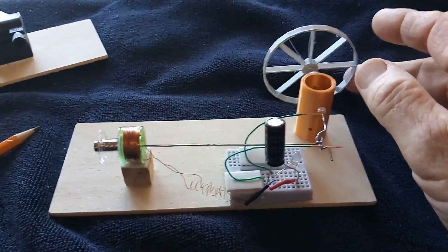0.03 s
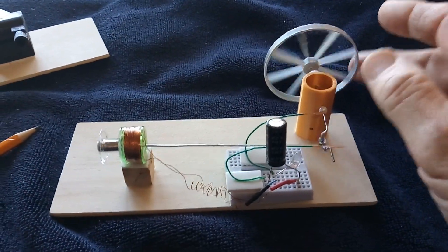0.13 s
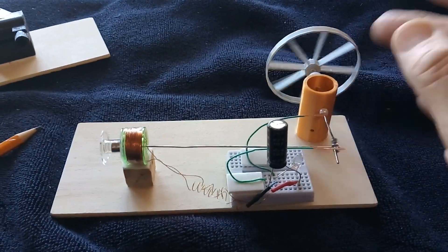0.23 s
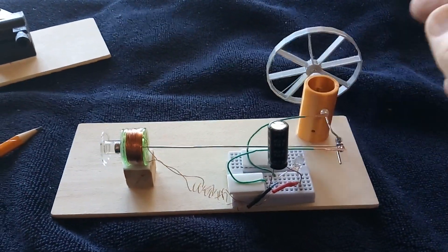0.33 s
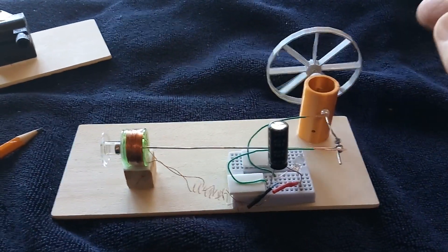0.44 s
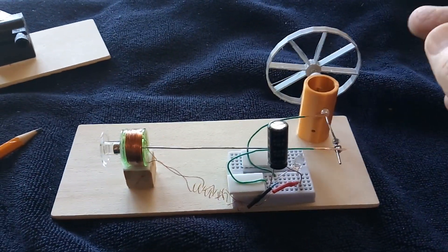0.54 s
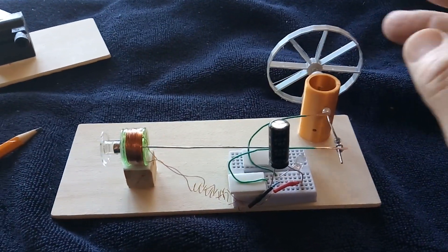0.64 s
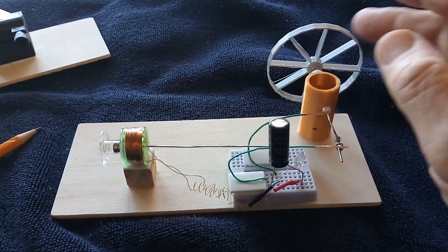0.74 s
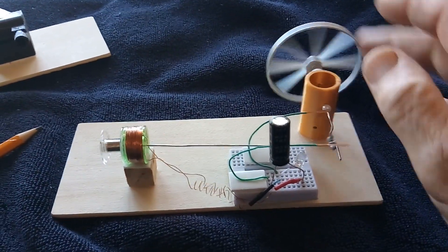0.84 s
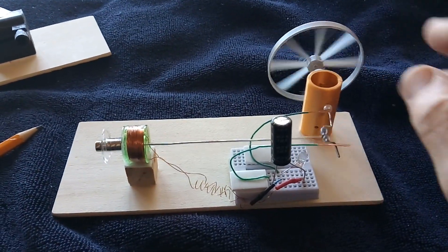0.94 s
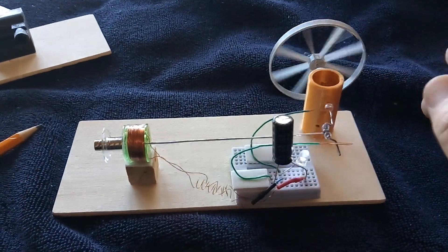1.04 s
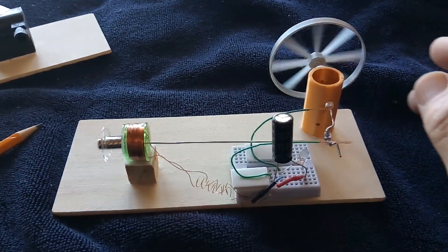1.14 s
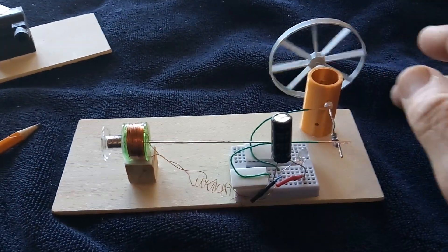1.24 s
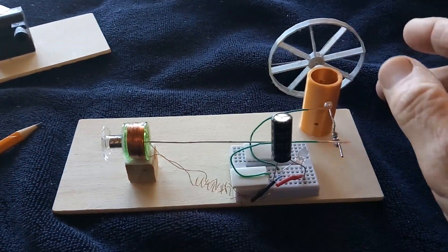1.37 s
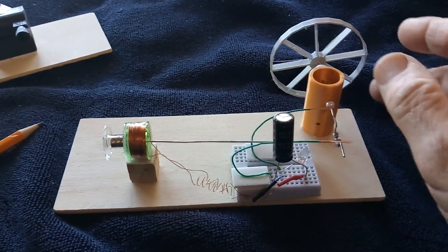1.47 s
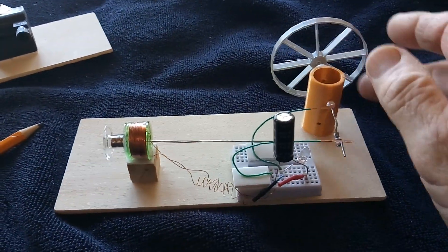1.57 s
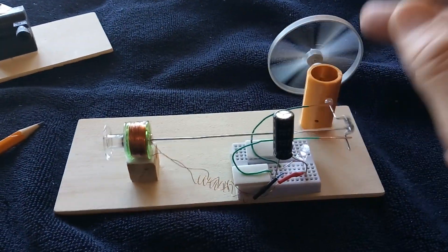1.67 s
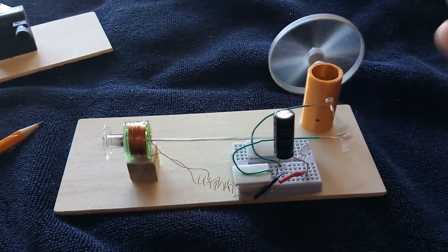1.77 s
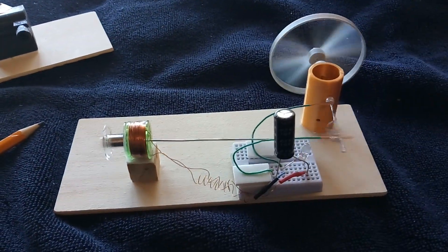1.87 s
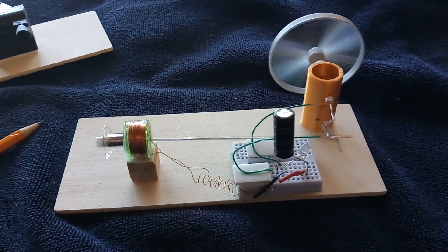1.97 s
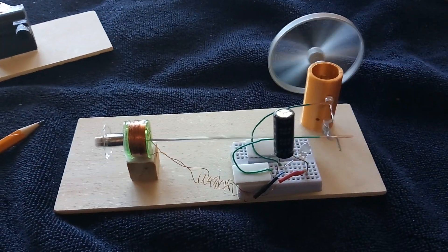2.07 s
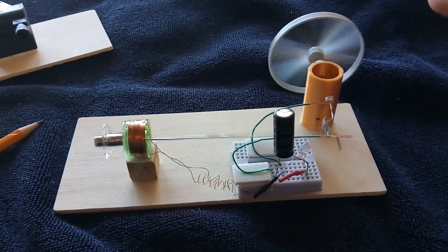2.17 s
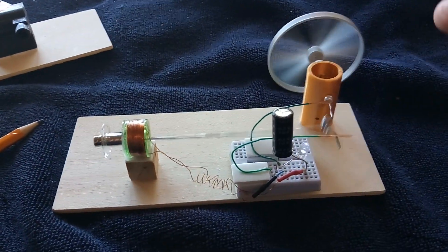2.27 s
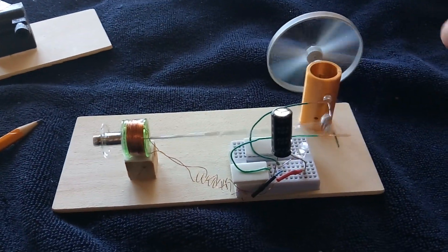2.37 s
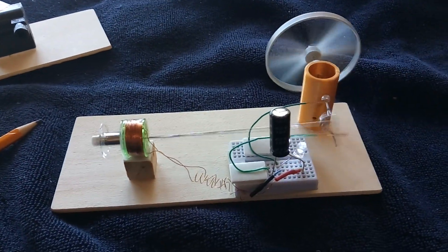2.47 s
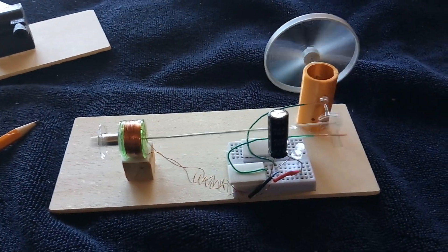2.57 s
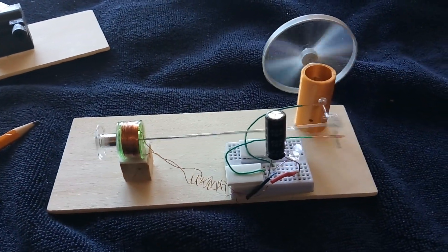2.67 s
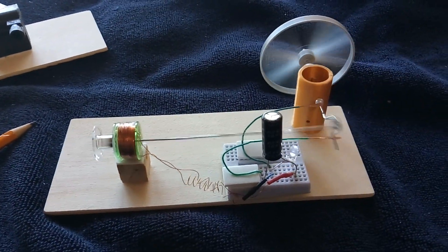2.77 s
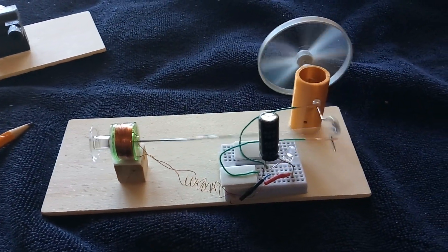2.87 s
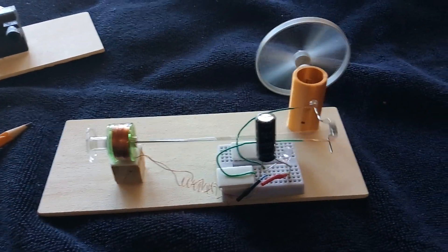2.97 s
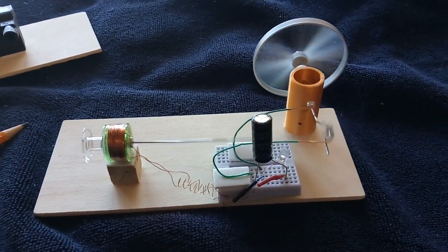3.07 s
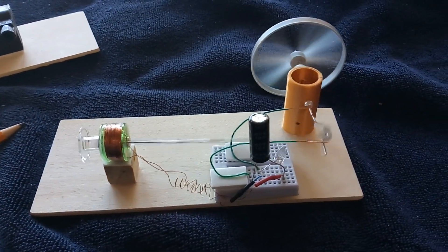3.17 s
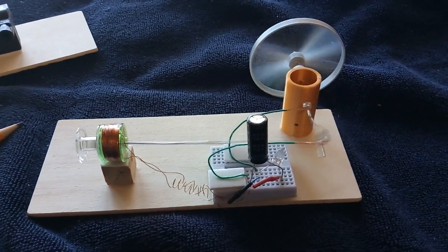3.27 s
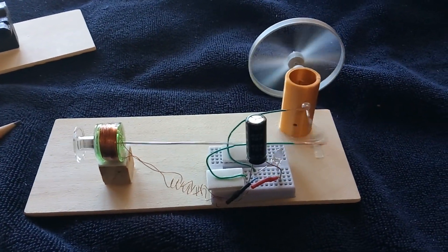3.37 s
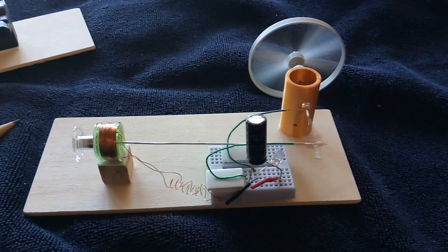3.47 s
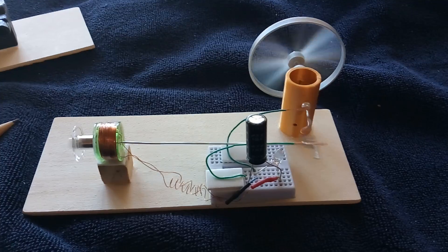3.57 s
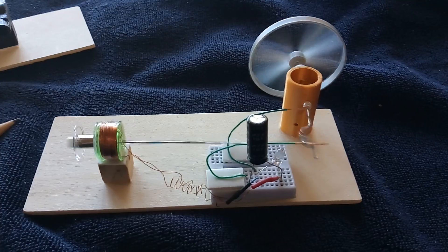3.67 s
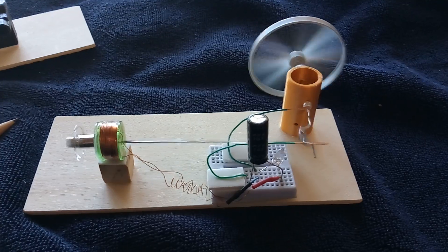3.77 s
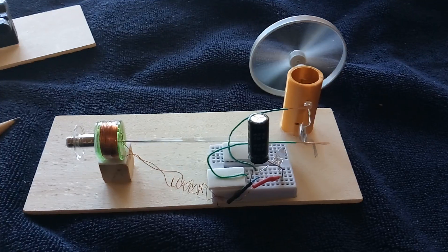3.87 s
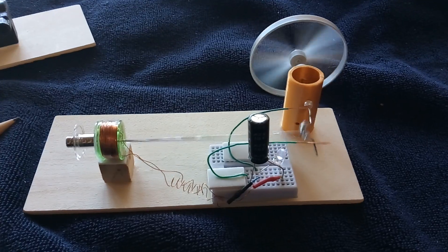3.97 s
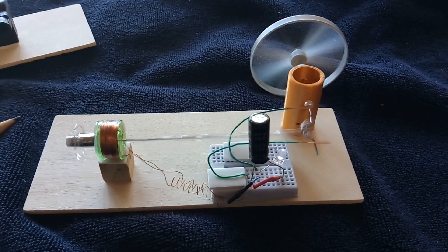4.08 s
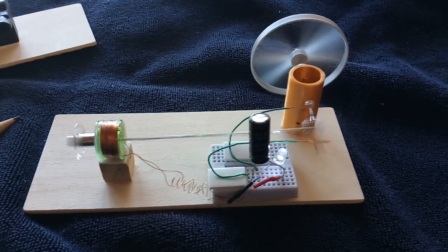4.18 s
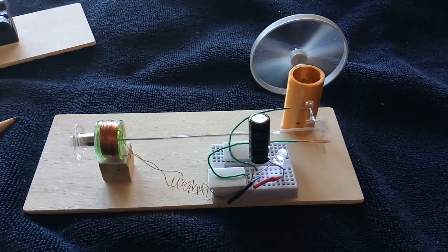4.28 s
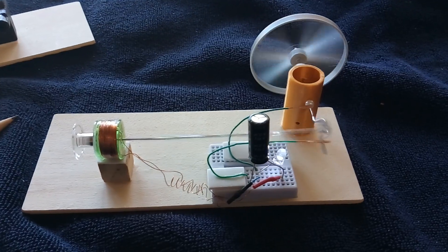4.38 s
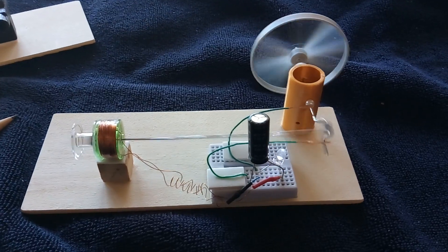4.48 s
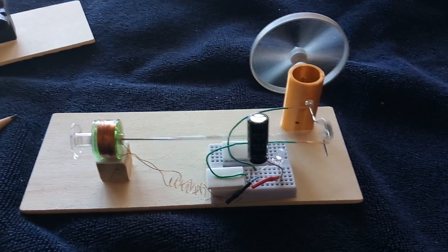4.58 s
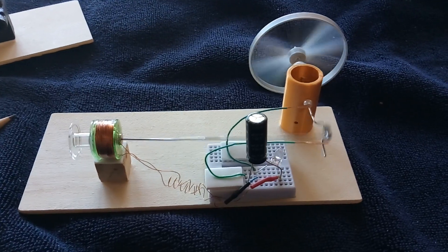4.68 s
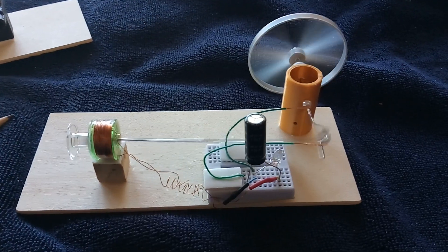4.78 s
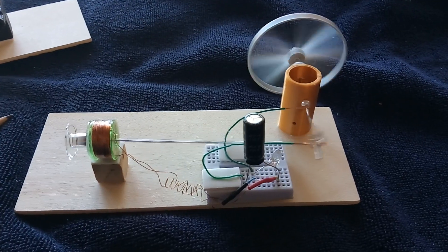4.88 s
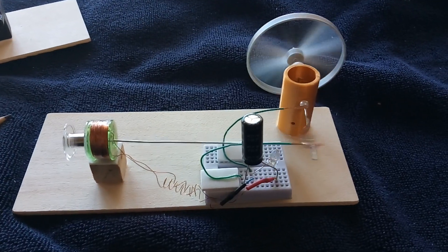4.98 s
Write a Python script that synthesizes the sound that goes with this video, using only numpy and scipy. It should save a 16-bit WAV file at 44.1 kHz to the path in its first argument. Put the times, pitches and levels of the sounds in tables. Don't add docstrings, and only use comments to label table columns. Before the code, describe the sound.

A few faint clicks and scrapes, then a small wooden-board engine catches and clatters rapidly, about nine hard knocks a second, sharper near the end.

```python
import sys
import numpy as np
from scipy import signal
from scipy.fft import rfft, irfft
from scipy.io import wavfile

SR = 44100
rng = np.random.default_rng(int(sys.argv[2]) if len(sys.argv) > 2 else 0)


def log_audio(samples):
    frames = np.atleast_2d(samples).T
    limited = np.clip(frames, -1, 1)
    pcm = np.round(limited * 32767).astype(np.int16)
    wavfile.write(sys.argv[1], SR, pcm)


def ratio(d):
    e = np.asarray(d, float) / 20
    return 10 ** e


N = 221081

# (time [s], board level [dB], steel level [dB])
RETURNS = [(2.24, -34, -32), (2.453, -34, -35), (3.0908, -28, -29), (3.1977, -38, -38), (3.3017, -31, -34),
           (3.726, -34, -30.5), (3.831, -20.5, -21.5), (3.939, -22, -22.5), (4.0463, -25.5, -24),
           (4.1525, -18, -17.5), (4.261, -17.5, -13), (4.3686, -18.5, -13.5), (4.476, -19.5, -13.5),
           (4.583, -21.5, -12.5), (4.6895, -20.5, -16.5), (4.798, -20.5, -14.5), (4.907, -23.5, -14.5)]


def band(x, lo_hz, hi_hz, order):
    return signal.sosfilt(signal.butter(order, [lo_hz, hi_hz], "bandpass", fs=SR, output="sos"), x)


def decay(t60_s):
    return np.exp(-np.log(1000) / (t60_s * SR))


def struck(force, modes, spot_db, rate_hz, slip_rad=0.98):
    out, power, hold = 0, 0, int(SR / rate_hz)
    for k, (hz, db, t60_s) in enumerate(modes):
        pole = decay(t60_s) * np.exp(2j * np.pi * hz / SR)
        share = ratio(db + spot_db * rng.standard_normal(N // 100))
        phase = np.pi * k + slip_rad * rng.standard_normal(N // 100)
        spot = np.repeat(share * np.exp(1j * phase), hold)[:N]
        out = out + signal.lfilter([1], [1, -pole], force * spot).imag
        power = power + ratio(db) ** 2
    return out / np.sqrt(power)


def ticks(rate_hz, spread_db):
    hit = rng.random(N) < rate_hz / SR
    x = hit * rng.choice([-1, 1], N) * ratio(spread_db * rng.exponential(size=N))
    return x / np.sqrt(np.mean(x ** 2))


def air():
    # (frequency [Hz], density [dB per Hz])
    noise_shape = [(15, -38), (30, -3), (60, 10.5), (118, 12.5), (220, 10.5), (400, 5.5), (460, 2.5),
                   (1220, -5), (3500, -8), (6500, -9.5), (8000, -21.5), (13500, -24.5), (15000, -10.5),
                   (16500, -58)]
    # (frequency [Hz], level [dB rms])
    hum_lines = [(118.4, -78), (296.1, -78.5), (355.3, -76), (414.5, -81.5), (925.9, -93), (2040, -98),
                 (8226, -93.5), (15418, -103)]
    level_db = -66.5
    hz, db = np.transpose(noise_shape)
    shape = ratio(np.interp(np.log(np.fft.rfftfreq(N, 1 / SR) + 1), np.log(hz), db))
    out = irfft(rfft(rng.standard_normal(N)) * shape, N)
    out *= ratio(level_db) / np.sqrt(np.mean(out ** 2))
    t = np.arange(N) / SR
    for f, line_db in hum_lines:
        drift_rad = np.cumsum(rng.standard_normal(N)) * 0.0018
        out += np.sqrt(2) * ratio(line_db) * np.sin(2 * np.pi * f * t + drift_rad)
    return out


def hits():
    # (time [s], board level [dB], steel level [dB])
    nudges = [(0.2341, -48, -55.5), (0.2458, -42, -64), (0.8057, -63, -55), (0.8582, -58, -71),
              (0.8838, -37, -40), (0.8915, -26.5, -52), (0.9405, -42, -60), (1.3749, -69, -58),
              (1.6812, -46, -53), (1.703, -52, -27), (1.709, -31, -35), (1.7407, -15.5, -18.5),
              (1.7994, -20.5, -24.5), (1.802, -57, -28), (1.8284, -25, -34)]
    # (time [s], board level [dB], steel level [dB])
    strays = [(1.9424, -23.5, -35), (1.9923, -22, -17), (1.9969, -27, -44), (2.3133, -36, -26),
              (2.6258, -32, -28), (2.6398, -27, -23.5), (3.0625, -31, -27.5), (3.1746, -27.5, -29),
              (3.5986, -29, -26), (3.9175, -33, -40), (4.0049, -17.5, -35), (4.025, -30, -38),
              (4.112, -19.5, -23), (4.1312, -38, -51), (4.2205, -19, -31.5), (4.2311, -17.5, -20),
              (4.2716, -25.5, -38), (4.3277, -12, -19), (4.3307, -42, -25), (4.4496, -20, -29),
              (4.761, -38, -27), (4.9794, -17, -23)]
    # (time [s], board peak [dB], steel peak [dB], rebound delay [ms])
    strokes = [(1.8657, -13.5, -15.5, 3.1), (1.9764, -11.5, -15.5, 3), (2.0842, -11.5, -14.5, 2.12),
               (2.1901, -12, -13, 3.1), (2.2955, -13.5, -15.5, 4.4), (2.4012, -12, -14.5, 4.4),
               (2.508, -12.5, -14.5, 4.8), (2.6144, -13.5, -15.5, 2.93), (2.7213, -12.5, -17, 3.15),
               (2.8297, -13.5, -16, 2.9), (2.9375, -13, -16.5, 3.26), (3.0452, -13, -14, 4.1),
               (3.1492, -13.5, -18, 3.1), (3.2542, -13.5, -15, 3.34), (3.3606, -13.5, -16.5, 4.9),
               (3.4673, -14, -18, 5.3), (3.5721, -14, -15.5, 3), (3.6788, -14.5, -16.5, 4.9),
               (3.785, -16, -17, 2.2), (3.892, -15, -18, 3.6), (3.999, -23.5, -20.5, 1.3),
               (4.106, -17.5, -22, 1.8), (4.2137, -20, -22.5, 3.2), (4.3222, -19, -25, 2.8),
               (4.4352, -9.5, -11, 5.7), (4.5422, -8, -10, 2.95), (4.6481, -8, -10, 4.5),
               (4.7564, -8, -9.5, 2.94), (4.868, -8, -11.5, 2.8), (4.9751, -8, -8.5, 1.94)]
    # (time from stroke [ms], board [dB], steel [dB], wander [ms])
    snug_turn = [(-15.5, -48, -33, 0.45), (-8, -40.5, -35, 0.26), (9.5, -28, -35, 1.2),
                 (14, -31.5, -37, 1.5), (19, -32, -33.5, 1.2), (26, -30, -36.5, 0.87), (32, -37, -39, 2.5),
                 (38, -49, -37.5, 2.5), (52, -32, -34.5, 2.7), (57.5, -33.5, -40, 2.5),
                 (71, -29, -39.5, .8), (74, -39.5, -44, 1.2), (79.5, -32.5, -61, 1.16)]
    # (time from stroke [ms], board [dB], steel [dB], wander [ms])
    loose_turn = [(-21, -53, -30, .8), (-14.5, -34, -29, .6), (-11.5, -25.5, -19.5, .6), (-4, -24, -46, .8),
                  (11, -33, -38, 1.9), (29.5, -52, -35, 4.1), (54, -30, -45, 1.8), (66, -26.5, -40, 1.5)]
    loose_from_s, scatter_db = 4.4, 2.5

    rows = nudges + strays + RETURNS
    rows += [(s + 0.0033, board_db - 3.1, steel_db - 9.5) for s, board_db, steel_db in RETURNS]
    for s, board_db, steel_db, rebound_ms in strokes:
        rows.append((s, board_db, steel_db))
        rows.append((s + rebound_ms / 1000, board_db - 12, steel_db - 5.5))
        turn = np.array(loose_turn if s > loose_from_s else snug_turn)
        chance = rng.standard_normal((len(turn), 3))
        at_s = s + (turn[:, 0] + turn[:, 3] * chance[:, 0]) / 1000
        levels_db = turn[:, 1:3] + scatter_db * chance[:, 1:]
        rows += [row for row in np.column_stack([at_s, levels_db]) if row[0] < N / SR]
    return np.transpose(rows)


def contact(s, db, bounce_s, bounce_db, chatter_t60_s, chatter_db, rate_hz):
    at = np.minimum((s - 0.0004) * SR, N - 1).astype(int)
    blows, rebounds = np.zeros(N), np.zeros(N)
    np.add.at(blows, at, ratio(db))
    gaps = 0.8 + 0.4 * rng.random((len(at), 2))
    late = at[:, None] + (np.cumsum(gaps, axis=1) * bounce_s * SR).astype(int)
    sizes = ratio(db)[:, None] * ratio(bounce_db * np.array([1, 2])) * [-1, 1]
    np.add.at(rebounds, np.minimum(late, N - 1), sizes)
    shake = signal.lfilter([1], [1, -decay(chatter_t60_s)], blows)
    return blows + rebounds + ratio(chatter_db) * shake * ticks(rate_hz, 3.0)


def rubbing():
    # (middle [s], half length [s], board level [dB], steel level [dB])
    slides = [(.25, 0.022, -66, -72), (0.824, 0.026, -79, -68), (.92, 0.042, -62, -62),
              (1.028, 0.019, -63.5, -51), (1.082, 0.034, -72.5, -59.5), (1.203, 0.035, -69, -70),
              (1.37, .05, -78, -67)]
    # (time [s], board level [dB], steel level [dB])
    running = [
        (0, -78.5, -80),
        (1.6, -87, -80.5),
        (1.67, -61.5, -50.5),
        (1.75, -52, -45.5),
        (1.91, -59, -55),
        (3.89, -60.5, -53),
        (5.01, -55, -68),
    ]
    t = np.arange(N) / SR
    s, *levels_db = np.transpose(running)
    rub = ratio(np.array([np.interp(t, s, db) for db in levels_db]))
    for mid_s, half_s, *db in slides:
        rub = rub + ratio(np.array(db))[:, None] * np.exp(-((t - mid_s) / half_s) ** 2)
    return rub


def engine():
    # (frequency [Hz], level [dB], T60 [s])
    board_modes = [(456, -20, 0.038), (575, -21.5, 0.011), (691, -4.5, 0.023), (980, -41, 0.0073),
                   (1007, 15, 0.0094), (1281, 13, 0.0053), (1520, -36, 0.005), (1588, 12, 0.0048),
                   (2090, 8, 0.0097), (2330, -1.5, 0.02), (2607, 1, .018), (3140, 2, 0.0086),
                   (3787, 0, 0.012)]
    # (frequency [Hz], level [dB], T60 [s])
    steel_modes = [(4473, 4, 0.0072), (5410, -0.5, 0.0081), (5150, -10, 0.0049), (5882, 8.5, 0.01),
                   (6243, 9.5, 0.0096), (6698, 13, 0.0082), (6500, -43, 0.01), (7240, -8, .008)]
    # (frequency [Hz], level [dB], T60 [s])
    wire_modes = [(8440, 3, 0.034), (8940, 4, 0.002), (10500, -10.5, 0.021), (11050, -5, 0.0049),
                  (12400, -14, 0.0054), (15600, -12, .006)]
    s, board_db, steel_db = hits()
    dull, bright = rubbing()
    thud = contact(s, board_db - 0.5, bounce_s=0.0006774, bounce_db=-3.0,
                   chatter_t60_s=0.031, chatter_db=-26.0, rate_hz=1500)
    thud += ratio(-9.5) * dull * ticks(1200, 1.66)
    ping = contact(s, steel_db - 6, bounce_s=0.0005, bounce_db=1.61,
                   chatter_t60_s=0.034, chatter_db=-23.5, rate_hz=2500)
    ping += ratio(-19.5) * bright * ticks(2500, 1.1)
    board = band(struck(thud, board_modes, spot_db=1.26, rate_hz=150, slip_rad=0.3), 520, 3800, order=3)
    steel = band(struck(ping, steel_modes, spot_db=1.5, rate_hz=140), 2520, 8350, order=3)
    wire = band(struck(ping, wire_modes, spot_db=7.0, rate_hz=140), 9800, 15500, order=2)
    return board + steel + ratio(-26) * wire


def tap(s, db, modes):
    force, n = np.zeros(N), int(0.0012 * SR)
    force[(np.atleast_1d(s) * SR).astype(int)] = ratio(db)
    skid = np.hanning(n) * rng.standard_normal(n)
    force = np.convolve(force, skid / np.sqrt(np.sum(skid ** 2)))[:N]
    return band(struck(force, modes, spot_db=2.3, rate_hz=100, slip_rad=0.46), 440, 8200, order=2)


def small_parts():
    # (frequency [Hz], level [dB], T60 [s])
    rim_modes = [(680, -1.5, 0.018), (950, 1.5, 0.021), (2100, -10, 0.017), (5020, -7, 0.021),
                 (5770, -2.5, 0.021), (6590, 5.5, .018), (7700, -14, .01)]
    # (frequency [Hz], level [dB], T60 [s])
    hub_modes = [(960, 0, 0.027), (2200, -2.5, 0.024), (4500, -7, 0.017), (6300, -16, .008)]
    # (frequency [Hz], level [dB], T60 [s])
    pin_modes = [(4520, 0, .009)]
    flick = tap(0.8838, -27, rim_modes)
    settle = tap(1.1775, -39, hub_modes)
    s, _, steel_db = np.transpose(RETURNS)
    return flick + settle + tap(s, steel_db - 10.5, pin_modes)


def switch(scrape_db, share, snap_db, snap_at):
    # (time [s], turns since the wire first closes [turns])
    wheel_turns = [(1.645, -1), (1.765, 0), (1.879, 1), (1.988, 2), (2.094, 3), (2.623, 8), (3.048, 12),
                   (3.685, 18), (4.332, 24), (5.086, 31)]
    turn = np.interp(np.arange(N) / SR, *np.transpose(wheel_turns))
    width = share * np.where(turn % 1 > 0.5, 0.8, 1.1)
    touch = np.exp(-((turn - np.round(turn)) / width) ** 2) * (turn > -0.5)
    touch += 0.12 * np.clip(turn / 2, 0, 1)
    scrape = band(touch * ticks(900, 3.5), 14750, 15500, order=3)
    snaps = np.diff(np.floor(turn - snap_at), prepend=-2) * ratio(1.5 * rng.standard_normal(N))
    snap_modes = [(10500, 12, 0.006), (12300, -20, 0.01)]  # Hz, dB, T60 s
    snap = band(struck(snaps, snap_modes, spot_db=-4.0, rate_hz=89), 6500, 15000, order=2)
    return ratio(scrape_db) * scrape + ratio(snap_db) * snap


def room(x):
    t60_s, level_db, dull_hz, onset_s = 0.21, -20.5, 7300, 0.0074
    t = np.arange(SR // 2) / SR
    tail = rng.standard_normal(len(t)) * ratio(-60 * t / t60_s) * np.minimum(t / onset_s, 1)
    tail = signal.lfilter(*signal.butter(1, dull_hz, fs=SR), tail)
    return ratio(level_db) * signal.fftconvolve(x, tail / np.sqrt(np.sum(tail ** 2)))[:N]


def scene():
    near = engine() + small_parts() + switch(scrape_db=-47, share=0.19, snap_db=-54, snap_at=0.58)
    return (near + room(near) + air())[None]


def band_limit(x):
    return signal.sosfilt(signal.butter(12, 16650, fs=SR, output="sos"), x)


def record(dry):
    excess = dry - np.tanh(2.0 * dry) / 2.0
    dry = dry - signal.sosfilt(signal.butter(2, 400, "highpass", fs=SR, output="sos"), excess)
    top = signal.sosfiltfilt(signal.ellip(6, 0.2, 40, 15550, "highpass", fs=SR, output="sos"), dry)
    return band_limit(dry - 0.64 * top)


dry = scene()
out = record(dry)
log_audio(out)
```